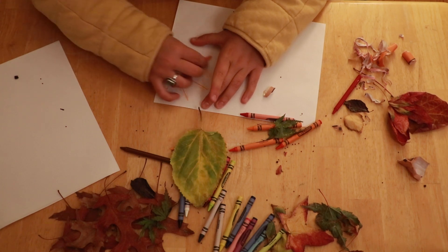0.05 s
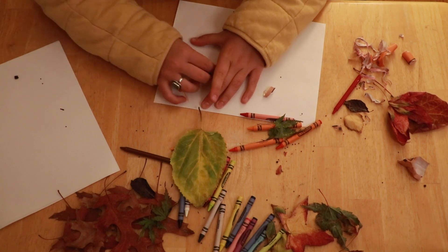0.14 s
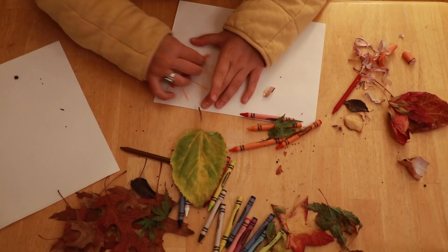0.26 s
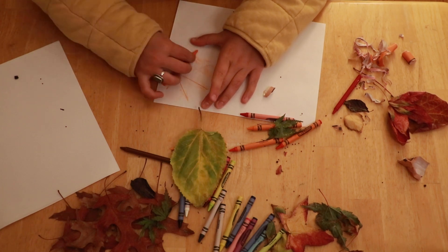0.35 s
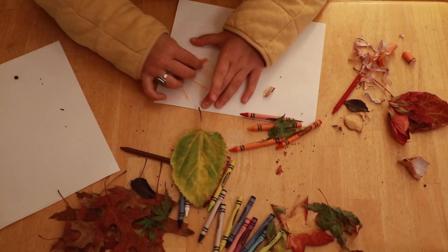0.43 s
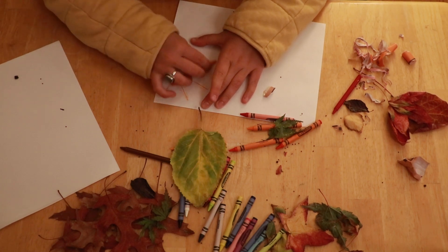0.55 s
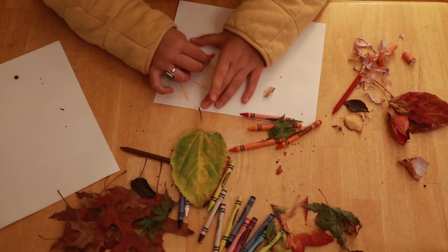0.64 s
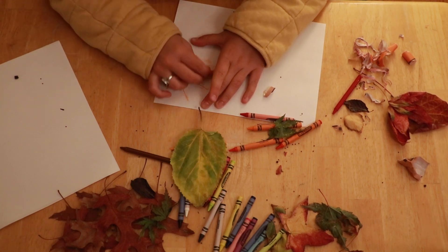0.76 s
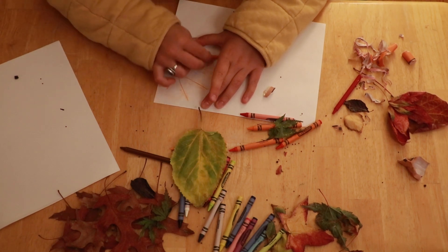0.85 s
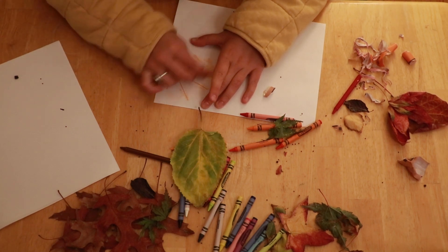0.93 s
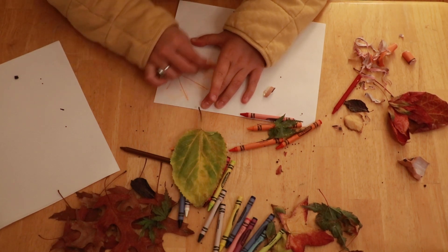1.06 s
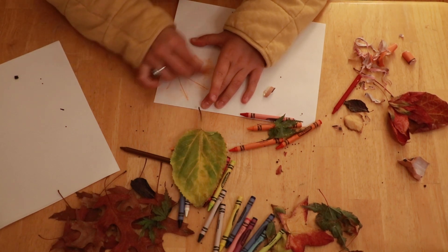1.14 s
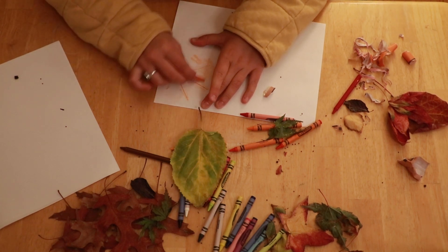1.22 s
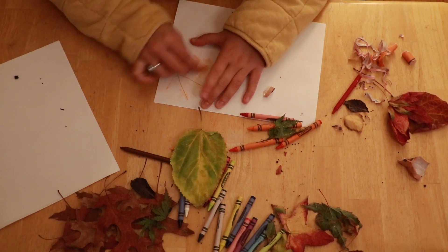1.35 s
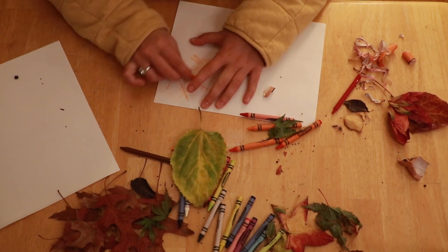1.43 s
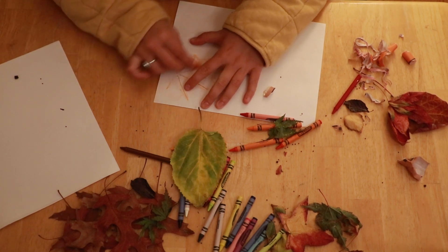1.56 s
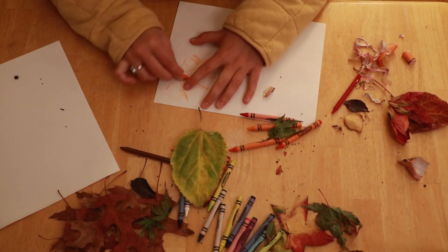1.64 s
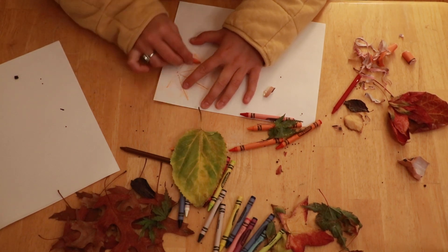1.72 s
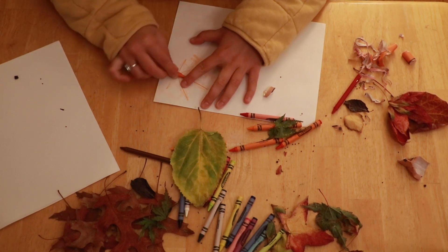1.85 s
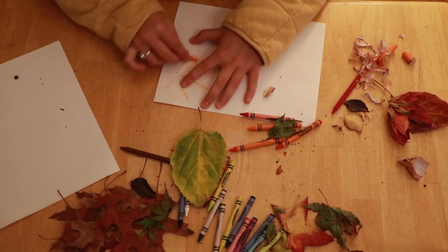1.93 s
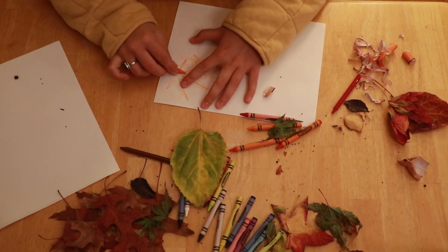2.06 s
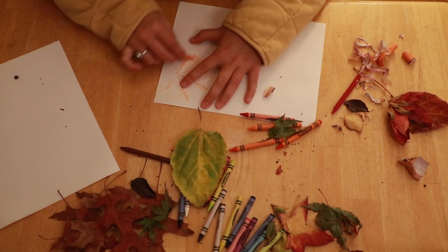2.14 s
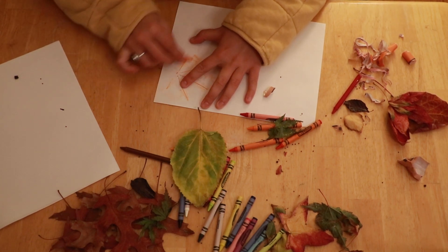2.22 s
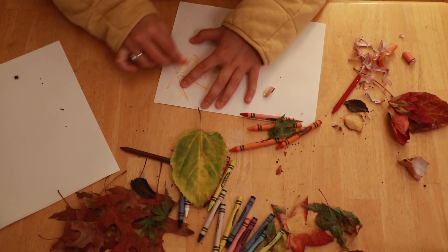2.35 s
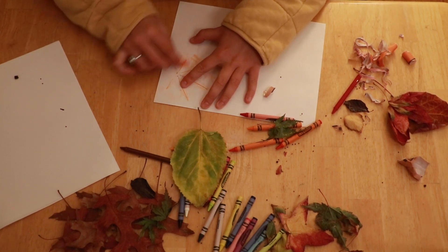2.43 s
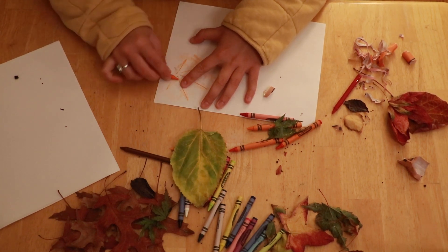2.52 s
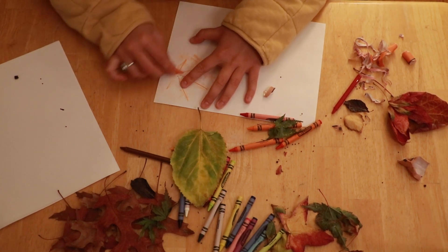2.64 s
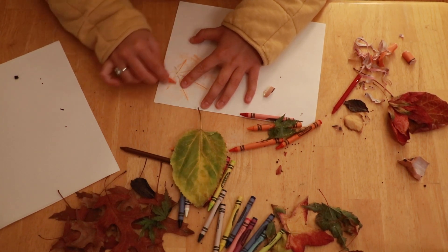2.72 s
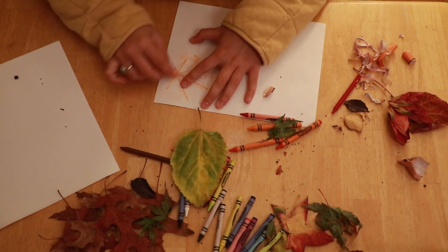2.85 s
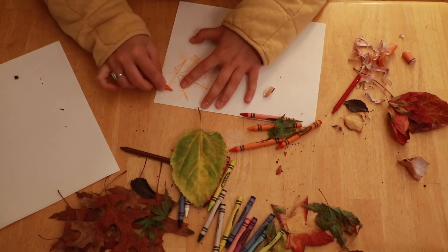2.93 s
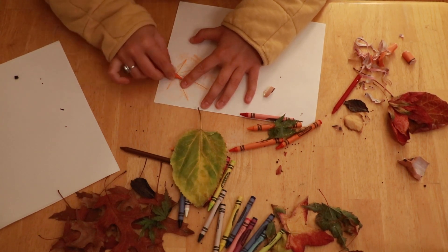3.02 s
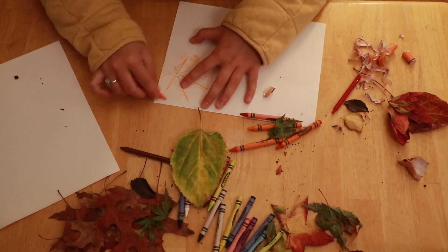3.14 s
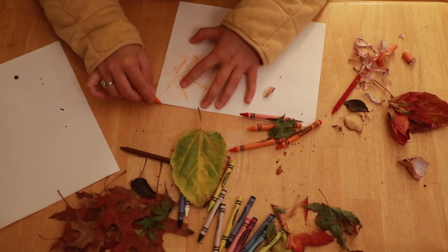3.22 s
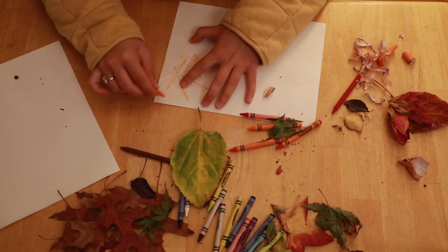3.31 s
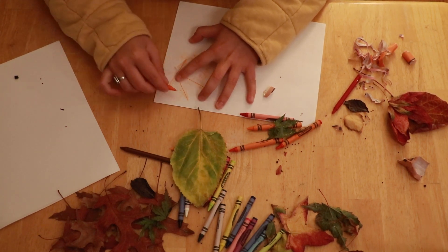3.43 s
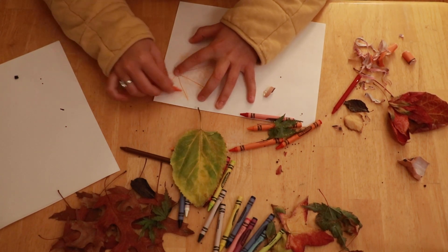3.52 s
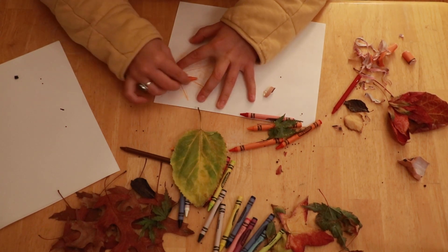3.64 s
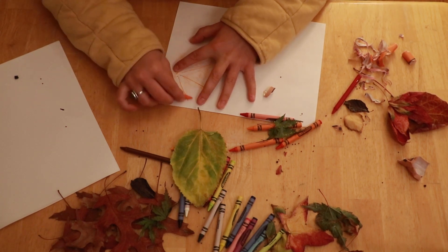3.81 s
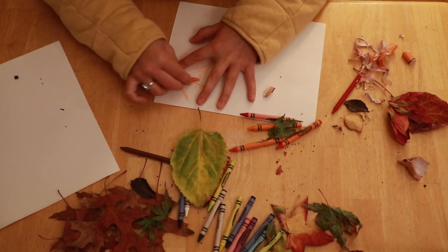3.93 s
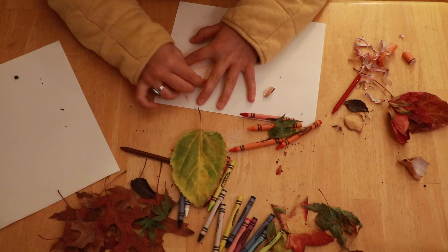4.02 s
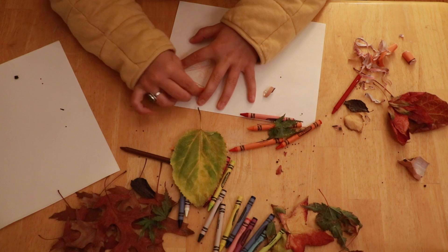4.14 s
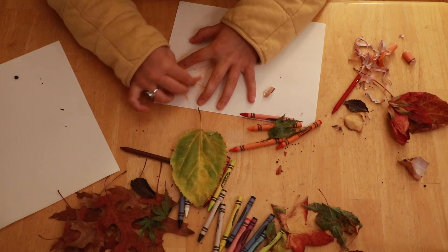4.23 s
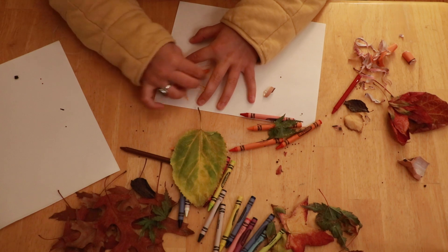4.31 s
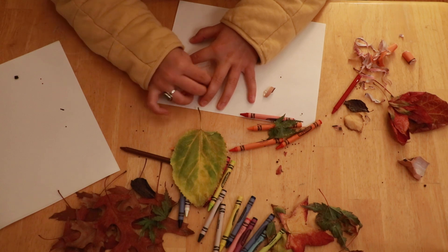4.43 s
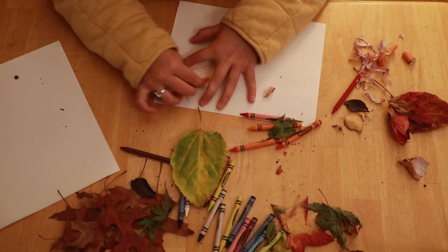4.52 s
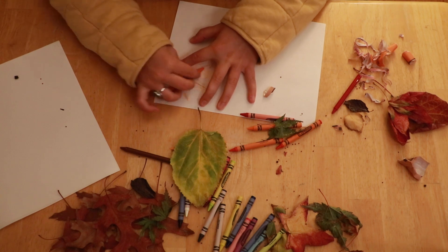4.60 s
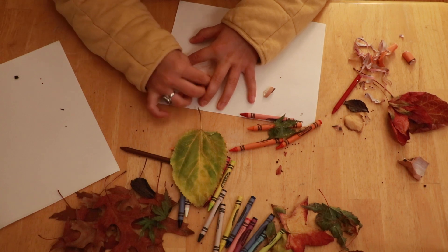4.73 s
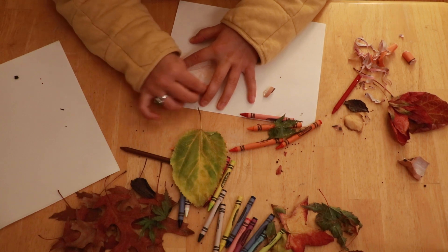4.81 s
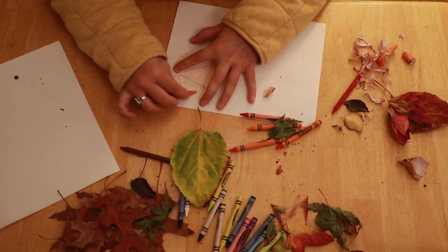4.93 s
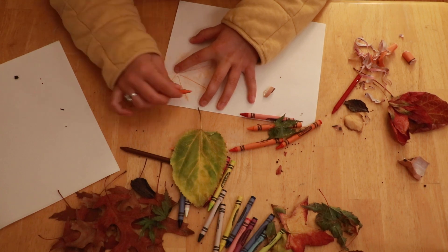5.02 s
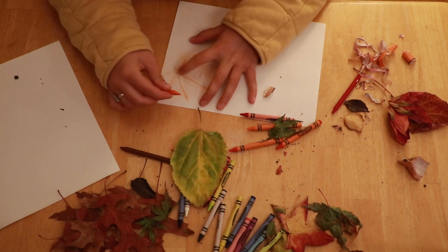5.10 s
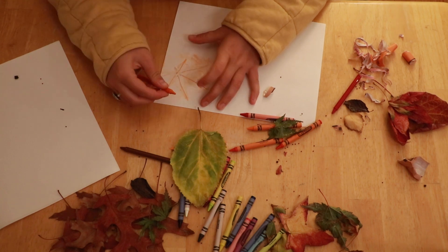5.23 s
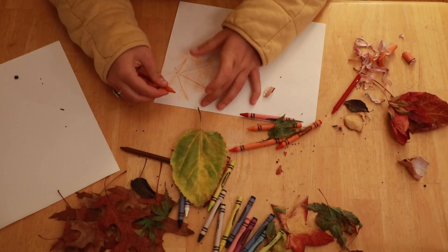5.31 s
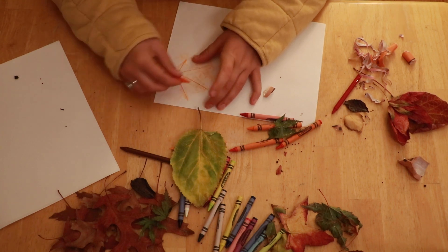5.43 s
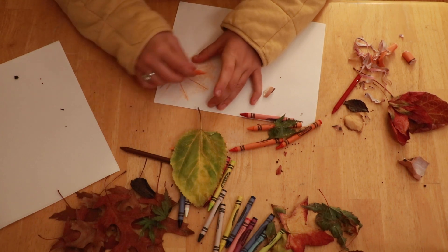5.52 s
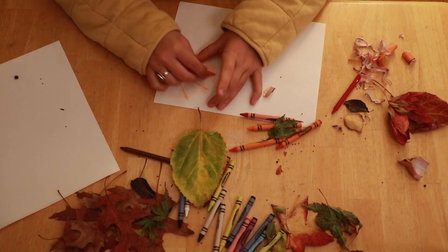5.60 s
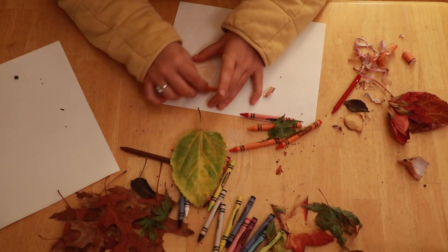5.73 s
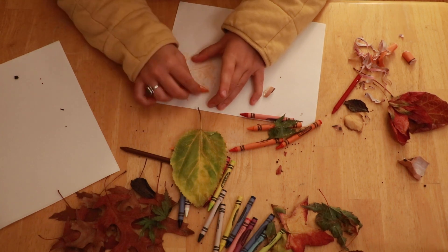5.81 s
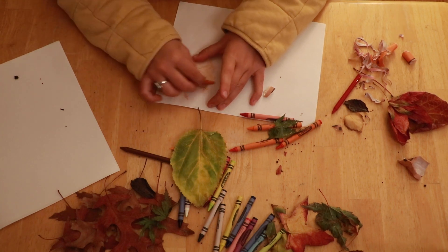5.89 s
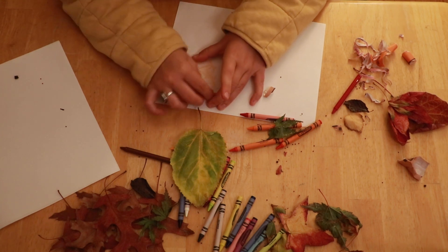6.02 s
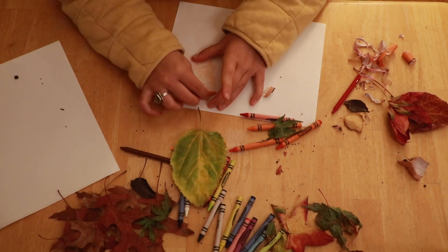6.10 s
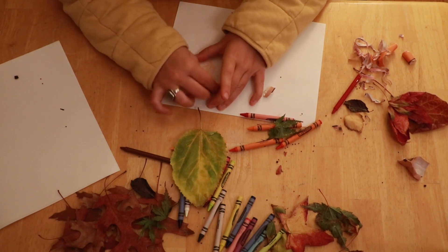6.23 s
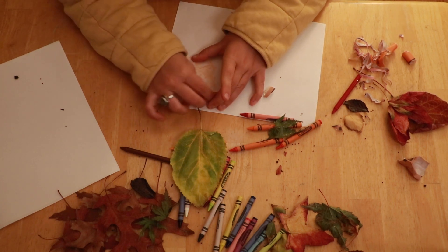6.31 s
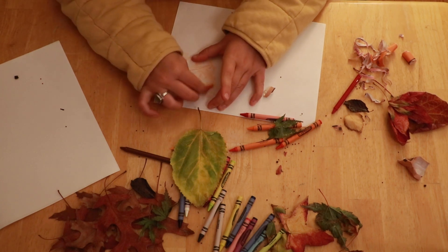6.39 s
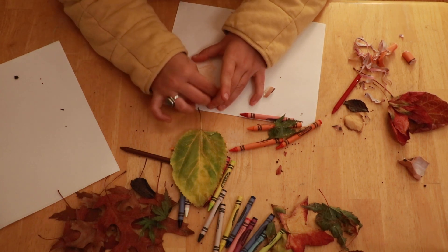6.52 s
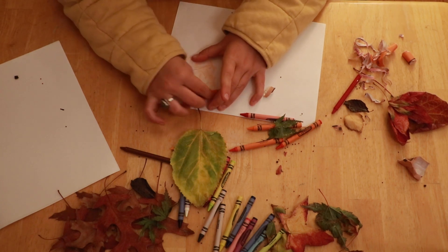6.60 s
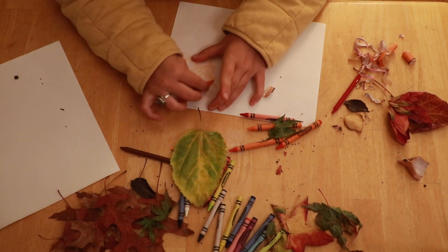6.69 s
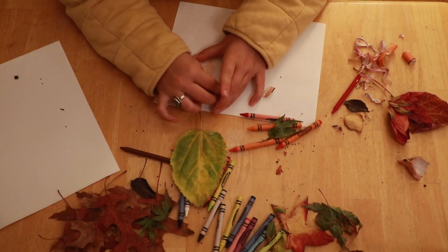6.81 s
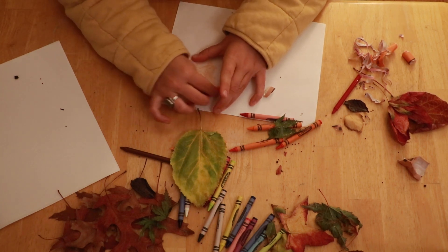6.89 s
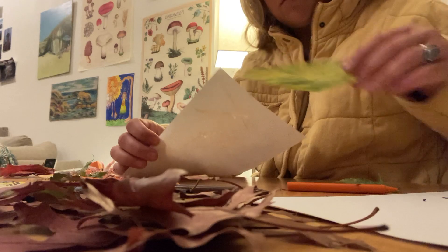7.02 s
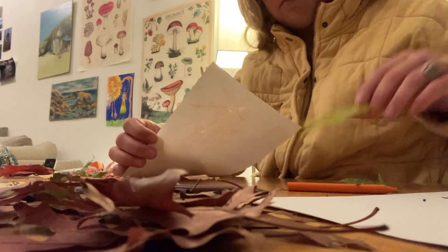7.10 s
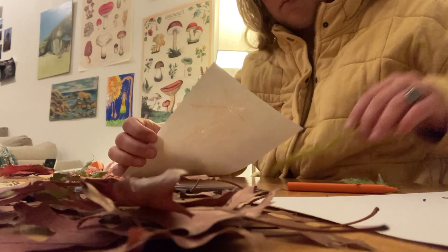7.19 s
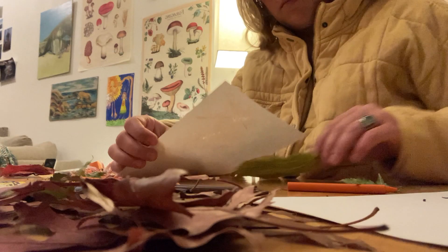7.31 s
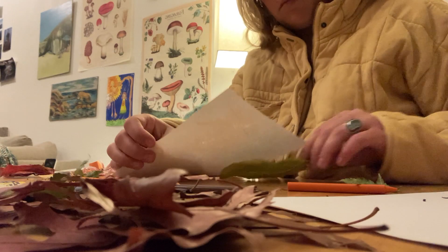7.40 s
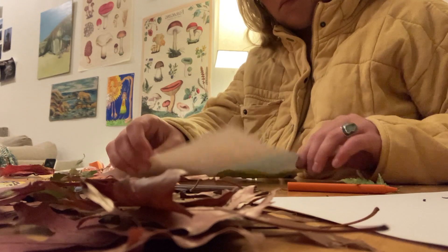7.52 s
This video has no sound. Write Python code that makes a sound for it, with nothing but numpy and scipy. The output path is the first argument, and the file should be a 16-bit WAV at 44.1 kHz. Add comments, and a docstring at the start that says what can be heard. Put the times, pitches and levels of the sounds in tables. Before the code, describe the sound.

Rapid short scratches of crayon on paper, about nine a second at the busiest, each with dry hiss and a dull woody rumble. Bumps over leaf veins tap the table and crisp ticks pop out. The rubbing stops, resumes slower and smoother with an airy treble edge, fades to faint hand sliding, then returns quieter. It ends with a soft click and paper rustle. Close microphones, quiet indoor room.

```python
"""Wax crayon rubbed over paper on a leaf on a wooden table, in stereo.
0-3.1 s: brisk strokes; grit hisses and scrapes, vein bumps ring the table modes, leaf and paper snap.
3.5-4.8 s: slower strokes, with a treble sheen of drifting band noise; then faint sliding of hand and sleeve.
5.5-7.0 s: more strokes. From 7.0 s: a lifted sheet rustles; at 7.2 s a leaf slides under it, a sinking rustle.
Shaped noise gives a quiet room throughout."""
import sys
import numpy as np
from scipy import signal
from scipy.fft import rfft, irfft, next_fast_len
from scipy.io import wavfile
from scipy.ndimage import uniform_filter1d

SR = 44100
rng = np.random.default_rng(int(sys.argv[2]) if len(sys.argv) > 2 else 0)


def generate_wav(sig):
    """Save sig (samples, or channels by samples) to the path in sys.argv[1] as 16-bit PCM at SR."""
    pcm = np.round(np.clip(np.atleast_2d(sig).T, -1, 1) * 32767).astype(np.int16)
    wavfile.write(sys.argv[1], SR, pcm)


N = 332955

# crayon strokes: contact t/s, lift t/s, hiss level at contact/dB, swell by the lift/dB, rumble over hiss/dB
STROKES = [(0.0, 0.073, -55, 2, 10), (0.182, 0.32, -53, -8, 11.5), (0.364, 0.441, -47, -2.5, 7),
           (0.519, 0.555, -51.5, -6.5, 9.5), (0.631, 0.683, -56, 9.5, 7.5), (0.763, 0.799, -50, 2, 10.5),
           (0.874, 0.919, -40.5, 0, 3.5), (0.957, 1.032, -50.5, 5.5, 9.5), (1.092, 1.144, -41.5, -0.5, 4),
           (1.202, 1.24, -40, -0.5, 8), (1.312, 1.348, -39.5, -0.5, 5), (1.408, 1.446, -41.5, -3.5, 5),
           (1.525, 1.572, -44.5, 5, 6), (1.63, 1.682, -41, -9, 6), (1.738, 1.79, -47.5, 6, 8),
           (1.849, 1.909, -38.5, -10, 7.5), (1.949, 1.998, -51.5, 5, 5.5), (2.06, 2.107, -48, -3.5, 5.5),
           (2.183, 2.234, -44.5, -4.5, 3.5), (2.288, 2.316, -48.5, 2.5, 6), (2.406, 2.441, -42.5, 6, 7.5),
           (2.51, 2.543, -47, 6.5, 10.5), (2.609, 2.646, -39, 0.5, 8.5), (2.695, 2.757, -50, 8.5, 11),
           (2.81, 2.851, -40, -2, 8), (2.936, 2.958, -45, 2, 7), (3.032, 3.093, -43.5, -5, 6),
           (3.539, 3.6, -46, -9, 6), (3.641, 3.716, -51, 9, 4), (3.815, 3.844, -45, -3.5, 3),
           (3.927, 4.04, -49, -5, -7), (4.082, 4.177, -48, -9, -5), (4.214, 4.324, -49, -1, -5),
           (4.432, 4.53, -54, -1, -5), (4.571, 4.65, -56, 4, -5.5), (4.694, 4.827, -55.5, 3.5, 0),
           (5.547, 5.607, -50, -7.5, 2), (5.616, 5.695, -46, -1, -2.5), (5.709, 5.74, -50, 2.5, -7.5),
           (5.779, 5.834, -52.5, 2, -5), (5.849, 5.905, -53, 5.5, -0.5), (5.936, 5.984, -50.5, 2.5, 3.5),
           (6.088, 6.196, -54.5, -6, 9.5), (6.211, 6.236, -56.5, 2.5, 14), (6.34, 6.42, -53.5, -4.5, 4.5),
           (6.462, 6.487, -49.5, -3.5, 6.5), (6.574, 6.654, -62, -4.5, 8), (6.682, 6.775, -50, -8, 8),
           (6.874, 6.973, -58.5, 7.5, 2), (6.984, 7.014, -54, 9, -1), (7.22, 7.393, -53.5, -7, -10.5)]
# hand and sleeve sliding under the strokes: t/s, scrape level/dB, rumble level/dB
SLIDE = [(0, -61.5, -50), (.7, -69, -53), (1.5, -63, -41), (2.3, -62, -47), (2.9, -68, -43),
         (3.1, -52, -53), (3.2, -72, -58.5), (3.5, -63, -54), (3.6, -55.5, -44.5), (4.3, -64.5, -52.5),
         (4.85, -61, -52.5), (4.93, -73, -61.5), (5.08, -71.5, -50), (5.3, -71.5, -62.5),
         (5.37, -65.5, -50), (5.5, -70, -63.5), (6.05, -64.5, -57), (6.55, -64.5, -48.5), (7.02, -59, -58),
         (7.2, -65, -64), (7.55, -52.5, -55.5)]
# hand action: t/s, scrape over hiss/dB, release of an even stroke/(dB/s)
HAND = [(0, 0, 500.5), (.5, -8, 700), (.8, 1, 899.5), (1.4, -1.5, 800.5), (1.9, 5, 700), (2.3, 0.5, 799),
        (2.8, 2.5, 801), (3.1, -1, 501), (3.7, -3.5, 600), (4, -13, 350), (4.8, -10.5, 300),
        (5.6, 0.5, 250), (5.75, -11, 300), (6.2, -8.5, 219), (7, -8.5, 402), (7.3, -2.5, 181.5)]
# treble sheen from the flat of the crayon, by stroke direction: t/s, level over hiss/dB, centre f/Hz
SHEEN = [(3.7, -30, 9000), (3.96, -2, 9500), (4.12, -15, 9600), (4.27, 1.5, 8350), (4.38, -13, 8600),
         (4.47, 1.5, 9300), (4.62, -1.5, 8350), (4.75, -6, 9100), (5.4, -11, 8800), (5.9, -6, 8900),
         (7.0, -5.5, 8700)]
# crayon meeting a vein or the table: t/s, knock peak level before KNOCK_DIRECT_DB/dB, push/ms
BUMPS = [(0.05, -42, 0.83), (0.061, -30.5, 0.34), (0.187, -49, 0.85), (0.418, -42.5, 1),
         (0.439, -41.5, 0.43), (0.652, -36, 0.9), (0.788, -23.5, 0.34), (0.864, -32, 0.4),
         (0.884, -24, 0.42), (0.893, -29.5, 0.3), (1.015, -32, 0.56), (1.104, -22, 0.52),
         (1.147, -29.5, 0.36), (1.212, -29, 0.66), (1.323, -31, 0.57), (1.449, -35.5, 0.57),
         (1.556, -43, 0.77), (1.572, -24, 0.73), (1.644, -24.5, 0.23), (1.741, -34, 0.68),
         (1.767, -21, 0.46), (1.798, -37, 1), (1.842, -16.5, 0.45), (1.849, -13, 0.25), (1.971, -31.5, 1),
         (2.001, -27.5, 0.44), (2.381, -38.5, 0.62), (2.405, -34.5, 0.81), (2.425, -23.5, 0.53),
         (2.526, -14, 0.27), (2.608, -23, 0.48), (2.624, -20, 0.53), (2.736, -14, 0.26), (2.794, -27, 0.5),
         (2.807, -22.5, 0.35), (2.819, -15.5, 0.6), (2.85, -22.5, 0.28), (3.045, -41, 0.27),
         (3.323, -47.5, 0.95), (3.544, -18.5, 1), (3.697, -25, 0.95), (3.715, -26.5, 0.77), (3.728, -23, 1),
         (3.83, -37, 0.98), (3.847, -32.5, 1), (4.007, -35.5, 0.99), (4.341, -40.5, 1), (4.707, -47, 1),
         (4.766, -40.5, 0.81), (5.052, -49, 1), (5.351, -47, 0.24), (5.551, -20, 0.29), (5.689, -32, 0.6),
         (5.979, -41, 1), (6.225, -43, 0.46), (6.232, -36.5, 0.89), (6.252, -37, 1), (6.488, -35, 0.86),
         (6.503, -36.5, 1), (6.53, -39, 0.94), (7.036, -34, 0.58), (7.22, -35.5, 0.55), (7.3, -48, 0.47),
         (7.376, -36.5, 0.94), (7.47, -44.5, 0.42)]
# leaf and paper snaps: t/s, level/dB, flake f/Hz, 60 dB decay of the tick/ms (long = soft crinkle)
SNAPS = [(0.311, -36, 7500, 16), (0.371, -38, 7310, 27), (0.552, -38, 8450, 57), (0.7303, -39.5, 8930, 8),
         (1.139, -26, 4300, 6), (1.147, -8.5, 5240, 4.8), (1.207, -25, 14000, 8), (1.403, -25, 12900, 16),
         (1.61, -31, 14000, 7), (2.2662, -38.5, 8150, 12), (2.742, -22, 9000, 10), (2.8077, -2, 11800, 3.1),
         (2.8502, -8, 8060, 5.8), (3.266, -46, 9400, 8.7), (3.6448, -27, 8650, 11.2),
         (3.656, -31, 10000, 12), (4.229, -38, 3480, 7.4), (4.3021, -40, 8290, 10), (5.346, -37.5, 8900, 9),
         (5.4826, -31, 7000, 6), (5.5135, -34, 13500, 5.2), (7.213, -29, 3060, 8), (7.221, -11.5, 3350, 5),
         (7.227, -26, 8450, 14), (7.232, -28, 7900, 13), (7.339, -40, 7880, 10), (7.47, -36, 2390, 7.6)]
# table-top modes, low and high: f/Hz, width f/Hz, relative level/dB
TABLE_LOW_MODES = [(55, 26, -7), (80.2, 14.3, 2.5), (117, 33, -4), (171.6, 29, -3), (212.2, 34.5, -4.5),
                   (249.8, 44, -5.5), (337, 32.3, -6.5), (371.7, 34, -0.5), (419.7, 69, -7)]
TABLE_HIGH_MODES = [(541, 80, -3), (602, 64, -2.5), (680, 48, -5), (832, 72, 0.5), (1041, 84, -1),
                    (1331, 160, -2.5), (1686, 140, -5), (2325, 190, -6.5), (2610, 284, -10.5),
                    (4400, 430, -16)]
# spectrum of the paper hiss: f/Hz, relative level per Hz/dB
PAPER_SPECTRUM = [(400, -7.5), (1500, -12), (3000, -1.5), (5000, -2), (6500, -2), (8000, -0.5),
                  (10000, 3.5), (12500, 2.5), (14500, 2), (16500, -10.5)]
# rustle of the lifted sheet: t/s, level/dB
SHEET = [(7.02, -90), (7.06, -70), (7.2, -71), (7.24, -61), (7.42, -62), (7.55, -51)]
# leaf gliding under the sheet: start t/s, stop t/s, start f/Hz, stop f/Hz, level before a doubling/dB
SWISH = (7.22, 7.38, 2850, 2400, -56.5)
# spectrum of the room air: f/Hz, relative level per Hz/dB
ROOM_SPECTRUM = [(15, -40), (25, -35), (48, 1.5), (145, -27), (212, -1.5), (263, -12.5), (335, -7),
                 (476, -21), (2690, -43), (6740, -40), (16000, -58)]
# right microphone against left: f/Hz, likeness/(0-1), level/dB, phase lead/half turns
MIC_PAIR = [(30, 0.98, 0.5, 0), (152, 0.91, 1.5, -0.09), (350, 0.79, -1.5, 0.0836), (688, 0.67, -4.5, 0.12),
            (1700, 0.7, -3.5, 0.44), (2500, 0.16, -4, -0.37), (3960, 0.69, -4, -0.12),
            (4940, 0.88, -4.5, -0.6), (5870, 0.9, -2, -1.07), (7090, 0.91, 1.5, -0.59), (11410, 1, -1, 1),
            (14900, 1, 0, 2.5), (16040, 1, 0, 2.75)]

ONSET_DB_PER_S = 896
FLICK_PER_DB = -0.06  # log of release per dB of swell: a swelling stroke dies away more slowly
SLIDE_HISS_DB = -12  # hiss against scrape, relative to the strokes
SHEEN_WIDTH_HZ = 2150
BITE_PER_KHZ = 1.02  # the more scrape against rumble, the more the upper low modes are driven
CRACK_DB, CRACK_DB_PER_KHZ = -33, 8.5  # paper crack over knock; kHz is 1 / push in ms
KNOCK_DIRECT_DB = 2.5  # knocks arrive louder straight than scattered
ECHO_T60_S, ECHO_DB, ROOM_DB = 0.53, -14.5, -55
EDGE_HZ, TOP_HZ = 15700, 16600
T, PAD = np.arange(N) / SR, next_fast_len(N + 8192)
F = np.maximum(np.arange(PAD // 2 + 1) * SR / PAD, 1)


def rubbing():
    """Fine grit hisses off the paper in wandering bands; coarser grit drives the table modes."""
    hiss, scrape, rumble = pressure()
    flutter = walk(70)
    fine = rfft(grit(14000, 3.0), PAD) * points(PAPER_SPECTRUM)
    octaves = np.log2(F / 600)
    tooth = 0
    for k in range(9):  # overlapping triangular bands
        band = np.clip(1 - np.abs(1.46 * octaves - k), 0, 1)
        tooth = tooth + undb(3.6 * walk(7.5)) * irfft(fine * band, PAD)[:N]
    tooth = unit(tooth) + sheen()

    coarse = unit(grit(2600, 2.2) * undb(3.36 * flutter))
    catch = np.clip(.5 + 0.43 * walk(25), 0, 1)  # share ringing the table; the rest rasps the sheet
    rasp = scrape * coarse
    table = through(catch * rasp, modes(TABLE_HIGH_MODES))
    paper = through((1 - catch) * rasp, modes([(1100, 1700, 0)]))

    drag = rumble * unit(grit(600, 2.7) * undb(1.73 * walk(25)))
    return hiss * unit(undb(2.47 * flutter) * tooth) + undb(1.5) * (table + paper) + roll(drag, scrape / rumble)


def roll(drag, scrape_ratio):
    """The moving crayon drives each low table mode unevenly, in soft thumps."""
    bite = scrape_ratio / np.median(scrape_ratio)
    spectrum = 0
    for k, (hz, width_hz, db) in enumerate(TABLE_LOW_MODES):
        thumps = rfft(drag * undb(2.14 * walk(9)) * bite ** (BITE_PER_KHZ * hz / 1000), PAD)
        spectrum = spectrum + (-1) ** k * undb(db) * peak(hz, width_hz) * thumps
    # a dull rasp, driven as the top mode, joins rumble to scrape
    x = irfft(spectrum + undb(-19) * peak(595, 400) * thumps, PAD)[:N]
    return x * np.std(drag) / np.std(x)


def pressure():
    """Hiss, scrape and rumble gains: stroke powers with quick onset and release add to the sliding hand."""
    s, *slide = np.transpose(SLIDE)
    scrape_db, rumble_db = (np.interp(T, s, c) for c in slide)
    s, *hand = np.transpose(HAND)
    hiss_db = scrape_db + SLIDE_HISS_DB - np.interp(T, s, hand[0])
    power = undb(2 * np.array([hiss_db, scrape_db, rumble_db]))
    for start, stop, db, swell_db, rumble_over_db in STROKES:
        scrape_over_db, release_db_per_s = (np.interp((start + stop) / 2, s, c) for c in hand)
        release_db_per_s = release_db_per_s * np.exp(FLICK_PER_DB * swell_db)
        a, b = max(int((start - .06) * SR), 0), int((stop + .2) * SR)
        t = T[a:b]
        level_db = np.interp(t, [start, stop], [db, db + swell_db])
        level_db = level_db - ONSET_DB_PER_S * np.maximum(start - t, 0)
        level_db = level_db - release_db_per_s * np.maximum(t - stop, 0)
        over_db = np.array([[0], [scrape_over_db], [rumble_over_db]])
        power[:, a:b] += undb(2 * level_db) * undb(2 * over_db)
    return np.sqrt(uniform_filter1d(power, size=400))  # the hand eases on and off


def grit(per_s, spread_db):
    """Wax catching and slipping on fibres: random ticks, a few far larger than the rest."""
    ticks = (rng.random(N) < per_s / SR) * rng.choice([-1., 1.], N)
    return unit(ticks * undb(np.minimum(spread_db * rng.exponential(size=N), 13)))


def sheen():
    """The flat of the crayon sings: low-passed grit shifted up to a drifting centre."""
    s, db, hz = np.transpose(SHEEN)
    slow = through(grit(9000, 2.6), 1 / (1 + 2j * F / SHEEN_WIDTH_HZ) ** 2)
    turns = np.cumsum(np.interp(T, s, hz)) / SR
    return undb(np.interp(T, s, db)) * unit(slow * np.cos(2 * np.pi * turns))


def bumps(size=8192):
    """A push and its chatter ring the table, softer contacts pushing longer; the paper cracks with it."""
    out, t, f = np.zeros(N + size), T[:size], np.arange(size // 2 + 1) * SR / size
    for (s, db, ms), noise in zip(BUMPS, rng.standard_normal((len(BUMPS), size))):
        top = modes(TABLE_HIGH_MODES, f, 3.0 * noise[::-1]) + undb(-13.5) * modes(TABLE_LOW_MODES, f)
        top = top + undb(7.5) * peak(1290, 2250, f)  # the blow itself, heard straight
        push = np.sin(np.pi * np.minimum(1000 * t / max(ms, .1), 1)) ** 2
        jolts = (t == 0) + undb(-30) * noise * undb(-60 * t / 0.11)
        knock = irfft(rfft(push) * rfft(jolts) * top)
        knock = knock / np.abs(knock).max()
        crack = burst(3800, 0.018, noise, 0.65) + undb(-12) * burst(3600, 0.11, noise[::-1], 1.3)
        crack_db = CRACK_DB + CRACK_DB_PER_KHZ / max(ms, .2)
        out[int(s * SR):][:size] += undb(db) * (knock + undb(crack_db) * crack)
    return out[:N]


def modes(table, f=F, spot_db=None):
    """Table-top modes, neighbours in opposite phase, weighted by the spot struck; unit gain for noise."""
    spot_db = np.zeros(len(table)) if spot_db is None else spot_db
    h = sum((-1) ** k * undb(db + spot_db[k]) * peak(hz, w, f) for k, (hz, w, db) in enumerate(table))
    return h / np.sqrt(np.mean(np.abs(h) ** 2))


def snaps(size=2048):
    """A broad tick rings briefly at the flake's pitch, a short rustle behind; slow ones have less kick."""
    out = np.zeros(N + size)
    for (s, db, hz, ms), noise in zip(SNAPS, rng.standard_normal((len(SNAPS), size))):
        t60_s, kick = max(ms, 1) / 1000, 25 / max(ms, 1)
        tick = burst(6500, t60_s, noise, 2, kick, 600)
        ring = undb(-3.5) * burst(hz, 1.36 * t60_s, noise, 0.35, kick)
        rustle = undb(-18) * burst(hz, 0.04, noise[::-1], 3.6, 0)
        out[int(s * SR):][:size] += undb(db) * (tick + ring + rustle)
    return out[:N]


def burst(hz, t60_s, noise, width, kick=4, bass_hz=1700):
    """A kick and decaying noise about a centre, width relative to it, peak 1; thin paper gives little bass."""
    t, f = T[:len(noise)], np.arange(len(noise) // 2 + 1) * SR / len(noise)
    bass_cut = (1j * f / bass_hz / (1 + 1j * f / bass_hz)) ** 3
    source = (noise + kick * (t == 0)) * undb(-60 * t / t60_s)
    x = irfft(rfft(source) * (peak(hz, width * hz, f) * bass_cut))
    return x / np.abs(x).max()


def swish():
    """Leaf gliding: a narrow rustle whose pitch sinks as it slows."""
    t0, t1, hz0, hz1, db = SWISH
    turns = np.cumsum(np.interp(T, [t0, t1], [hz0, hz1])) / SR
    gate = np.sqrt(np.clip(4 * (T - t0) * (t1 - T), 0, None)) / (t1 - t0)
    return undb(db) * gate * walk(300) * np.sin(2 * np.pi * turns) * 2


def sheet():
    """The lifted sheet rustles: grit through a broad upper-middle resonance."""
    level_db = np.interp(T, *np.transpose(SHEET)) + 2 * walk(40)
    return undb(level_db) * unit(through(grit(2500, 3.2), peak(3600, 3000)))


def diffuse(t60_s):
    """Scattered reflections: decaying noise, 0.19 s at most, with its spectrum levelled."""
    h = rfft(rng.standard_normal(8192) * undb(-60 * T[:8192] / t60_s), PAD)
    return h / np.sqrt(uniform_filter1d(np.abs(h) ** 2, size=1500))


def room_air():
    """Quiet room: two independent shaped noises under one wandering level."""
    return undb(ROOM_DB + 1.8 * walk(5.4)) * unit(through(rng.standard_normal((2, N)), points(ROOM_SPECTRUM)))


def undb(db):
    """dB to amplitude."""
    return 10 ** (np.asarray(db) / 20)


def unit(x):
    """Scale to RMS 1."""
    return x / np.sqrt(np.mean(x ** 2))


def walk(rate_hz):
    """Normal random values at rate_hz, joined by straight lines."""
    k = int(rate_hz * N / SR) + 2
    return np.interp(T * rate_hz, np.arange(k), rng.standard_normal(k))


def through(x, response):
    """Filter by a response given on the frequencies F."""
    return irfft(rfft(x, PAD) * response, PAD)[..., :N]


def points(table):
    """(f/Hz, level/dB) points joined on a log-frequency axis, as gain."""
    hz, db = np.transpose(table)
    return undb(np.interp(np.log(F), np.log(hz), db))


def peak(hz, width_hz, f=F):
    """One resonance, gain 1 at the centre."""
    return 1j * f * width_hz / (hz ** 2 - f ** 2 + 1j * f * width_hz)


def scene():
    """Left-microphone sound, and a scattered version that only the right one gets."""
    rub, knocks, ticks = (rfft(x, PAD) for x in (rubbing() + swish() + sheet(), bumps(), snaps()))
    room = 1 + undb(ECHO_DB) * diffuse(ECHO_T60_S)
    direct = rub + undb(KNOCK_DIRECT_DB) * knocks + ticks
    scattered = rub * diffuse(0.065) + (knocks + ticks) * diffuse(0.034)
    near = irfft(room * np.array([direct, scattered]), PAD)[:, :N]
    return near + room_air()


def record(dry):
    """The right channel is partly the left, phase turning with frequency; lowest bass and top are cut."""
    hz, like, db, lead = np.transpose(MIC_PAIR)
    likeness, gain = np.clip(np.interp(F, hz, like), 0, 1), undb(np.interp(F, hz, db))
    turn = np.exp(1j * np.pi * np.interp(F, hz, lead))
    shared = through(dry[0], gain * likeness * turn)
    right = shared + through(dry[1], gain * np.sqrt(1 - likeness ** 2))
    pair = signal.sosfilt(signal.ellip(6, .3, 26, EDGE_HZ, fs=SR, output="sos"), [dry[0], right])
    pair = signal.sosfilt(signal.butter(2, 35, "high", fs=SR, output="sos"), pair)
    return signal.sosfilt(signal.ellip(10, .2, 80, TOP_HZ, fs=SR, output="sos"), pair)


dry = scene()
out = record(dry)
generate_wav(out)
```